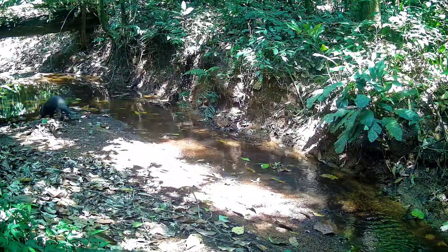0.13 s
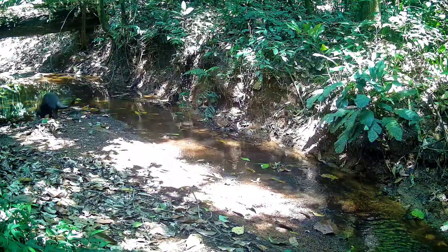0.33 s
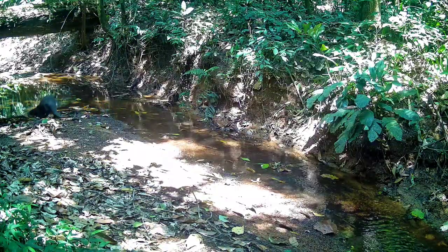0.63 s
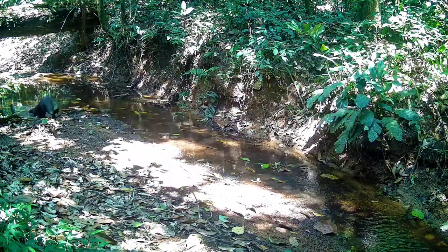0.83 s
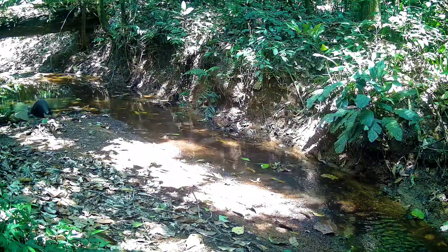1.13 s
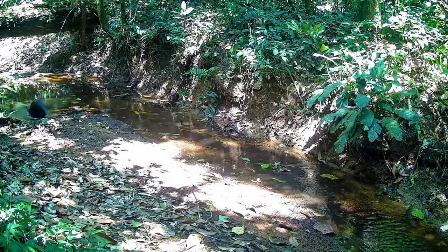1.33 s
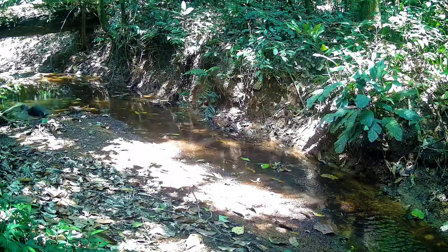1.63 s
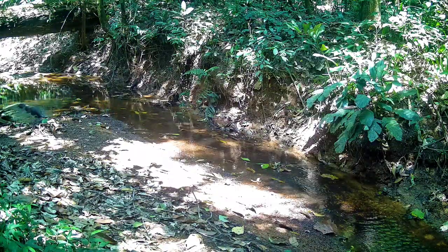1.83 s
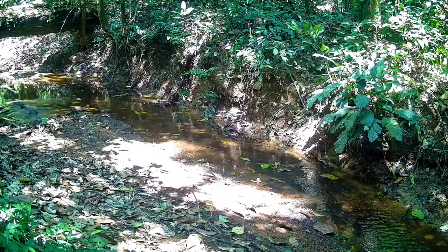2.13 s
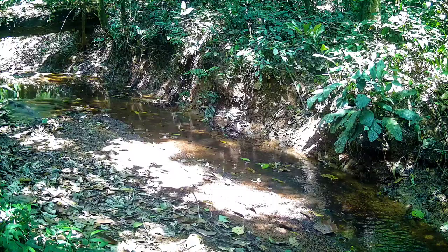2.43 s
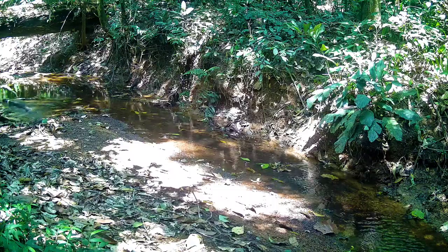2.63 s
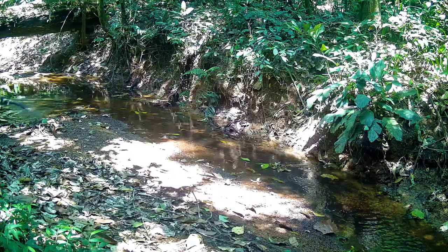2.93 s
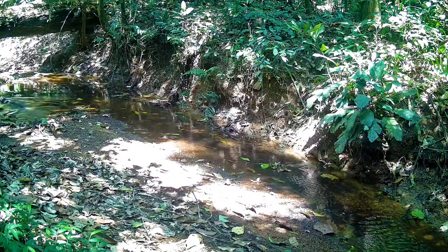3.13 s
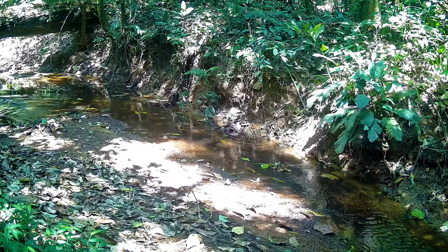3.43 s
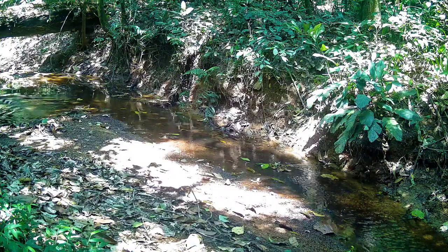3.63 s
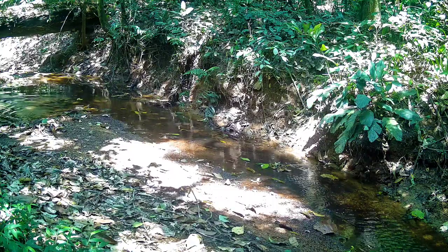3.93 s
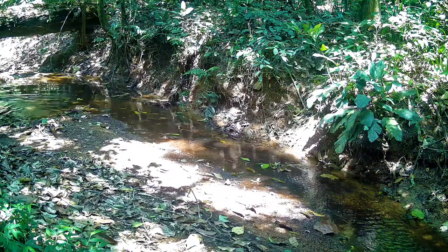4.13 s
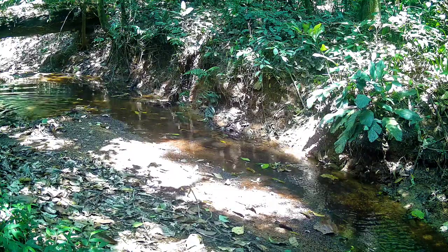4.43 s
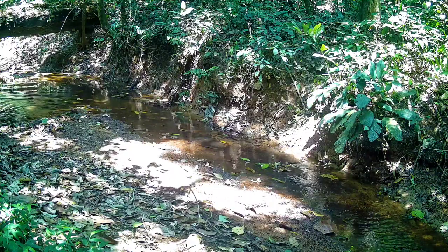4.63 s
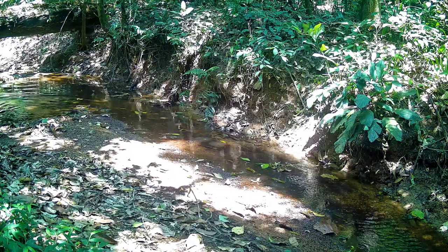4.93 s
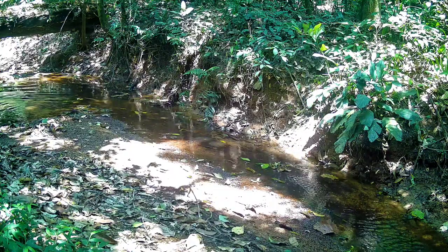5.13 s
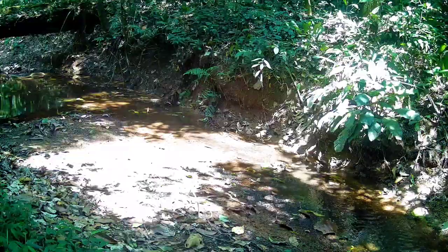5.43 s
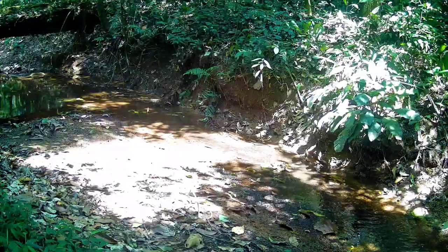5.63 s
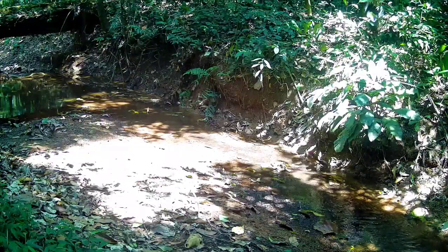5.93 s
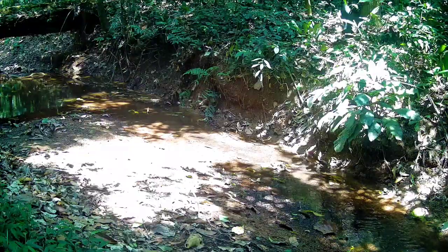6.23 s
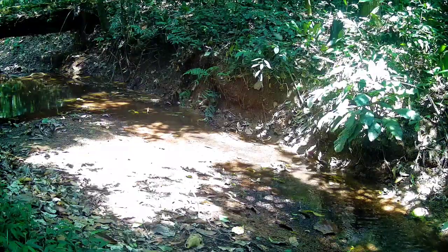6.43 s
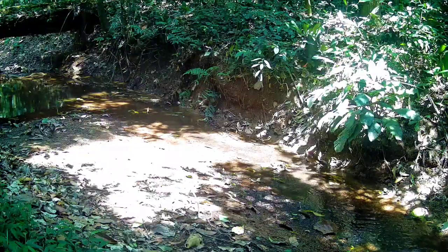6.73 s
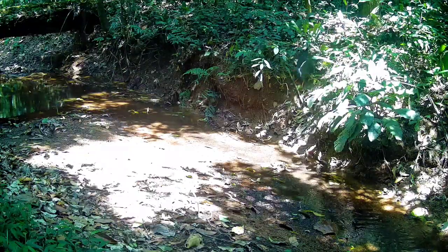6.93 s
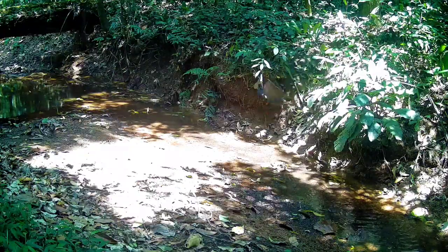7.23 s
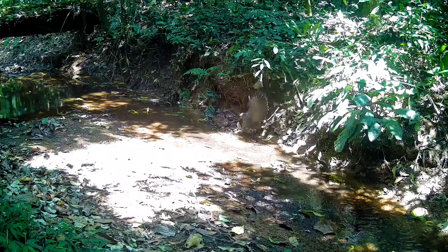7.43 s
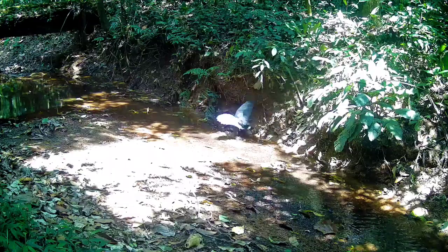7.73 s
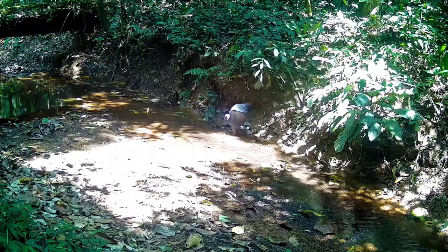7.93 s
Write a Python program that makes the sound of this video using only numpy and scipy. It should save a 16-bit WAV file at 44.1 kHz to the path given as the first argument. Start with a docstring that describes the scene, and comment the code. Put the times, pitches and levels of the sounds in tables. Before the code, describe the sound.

In a rainforest, cicadas hold a steady piercing trill above a soft shallow stream. Early on, one bird gives three quick, sharp falling chips with woody echoes, and faint whistles sound far off. The trill stops instantly at a hard cut. The stream remains, slightly louder, as a bird flicks through leaves and drops into the water with a short plop. A fixed outdoor microphone, with dull extreme treble.

```python
"""In a rainforest, cicadas trill in the trees over a shallow stream, until a cut to a second shot without them.
One bird gives three sharp falling chips, and others whistle far off. In the second shot the stream is
a little louder, and a bird flicks through the leaves and drops into the water with a plop.
The cicadas are clicks ringing hollow bodies, the birds gliding tones, the flicks shaped noise,
and the water is flickering noise with many small ringing bubbles."""
import sys
import numpy as np
from scipy import signal
from scipy.fft import rfft, irfft, next_fast_len
from scipy.io import wavfile
from scipy.ndimage import uniform_filter1d

SR = 44100
rng = np.random.default_rng(int(sys.argv[2]) if len(sys.argv) > 2 else 0)


def to_wav(sig):
    """Store sig (one row per channel, or 1-D mono) as 16-bit WAV at the path in sys.argv[1].

    Samples outside -1..1 are clipped; the rate is SR.
    """
    pcm = np.clip(np.atleast_2d(sig), -1, 1) * 32767
    pcm = np.round(pcm).astype(np.int16)
    wavfile.write(sys.argv[1], SR, pcm.T)  # frames by channels


N = 356107

TIME = np.arange(N) / SR  # seconds
GRID_HZ = np.arange(1, SR / 2, 20)  # frequencies at which resonances are drawn
CUT_S = 5.4505  # seconds at which the second shot begins
TOP_HZ = 8100  # highest pitch the microphone passes


def undb(db):
    """Turn decibels into a gain."""
    return np.exp(np.asarray(db) * (np.log(10) / 20))


def level(x, db):
    """Scale a sound to an rms level in dB."""
    return x * undb(db) / np.sqrt(np.mean(x ** 2))


def add(out, start, x):
    """Mix x into out, starting at a time in seconds."""
    i = int(start * SR)
    out[i:i + len(x)] += x[:len(out) - i]


def colour(x, points):
    """Filter x by a curve through (Hz, dB) points, straight lines over log frequency."""
    hz, db = np.transpose(points)
    size = next_fast_len(len(x) + SR // 10, True)
    f = np.maximum(np.fft.rfftfreq(size, 1 / SR), 1)
    gain = undb(np.interp(np.log(f), np.log(hz), db))
    return irfft(rfft(x, size) * gain, size)[:len(x)]


def walk(rate):
    """Chance drift with spread 1: random steps, rate of them per second, smoothed twice."""
    k = int(SR / rate)
    steps = np.repeat(rng.standard_normal(N // k + 1), k)[:N]
    return level(uniform_filter1d(uniform_filter1d(steps, k), k), 0)


def ring(hz, width):
    """Gain in dB of a resonance over GRID_HZ; it is 6 dB down at the edges of its width in Hz."""
    return -20 * np.log10(1 + (2 * (GRID_HZ - hz) / width) ** 2)


def forest(x, wet_db, t60, near_share, near_t60):
    """Direct sound, quick scatter from nearby leaves and a longer tail from the trunks."""
    t = TIME[:SR]
    # each t60 is the time in seconds to fade by 60 dB
    near = near_share / near_t60 * undb(-120 * t / near_t60)
    far = (1 - near_share) / t60 * undb(-120 * t / t60)
    scatter = rng.standard_normal(SR) * np.sqrt(near + far) * (t > .003)
    return x + undb(wet_db) * signal.oaconvolve(x, scatter / np.linalg.norm(scatter))[:N]


def bubble(hz, length, glide=0.057):
    """A pocket of air swells into ringing and dies, rising a little in pitch."""
    u = np.linspace(0, 1, int(length * SR))
    phase = 2 * np.pi * np.cumsum(hz * (1 + glide * (u - .5))) / SR
    return np.sin(np.pi * u ** .8) * np.sin(phase)


# Colour of the running water and the hush of the forest. Each row: frequency in Hz, gain in dB.
WATER_COLOUR = [(15, -44.5), (25, -14), (92, -1.5), (278, -4.5), (313, -6), (559, -3.5), (728, -3),
                (802, -3.5), (1180, -5), (1500, -5.5), (2490, -8), (4220, -9.5), (4650, -11), (6520, -13),
                (7900, -36.5), (10300, -67), (17400, -120)]
# How much softer the water is in the first shot. Each row: frequency in Hz, gain in dB.
WATER_FIRST_SHOT = [(60, -3), (200, -2), (600, -3.5), (1500, -3), (3000, -1.33), (6000, -2.5)]
STREAM_DB = -54  # rms level before the softening


def stream(first_shot, flicker_db=2.0, bubbles_db=-11, cycles=8, count=1500):
    """A soft wash whose octaves flicker on their own, with many small bubbles in it."""
    wash = np.zeros(N)
    size = next_fast_len(N, True)
    spectrum = rfft(rng.standard_normal(size))
    f = np.fft.rfftfreq(size, 1 / SR)
    for hz in 16 * 2 ** np.arange(10):
        octave = irfft(spectrum * (f >= hz) * (f < 2 * hz))[:N]
        wash += octave * undb(flicker_db * .5 * walk(10))
    babble = np.zeros(N)
    for when, pitch, loudness in rng.random((count, 3)):
        hz = 260 * 11 ** pitch  # 260 to 2860 Hz
        add(babble, when * N / SR, undb(3.7 * loudness) * bubble(hz, cycles / hz))
    mix = level(colour(wash, WATER_COLOUR), 0) + level(babble, bubbles_db)
    water = level(mix, STREAM_DB)
    return first_shot * colour(water, WATER_FIRST_SHOT) + (1 - first_shot) * water


SCOOP_S, SAG_HZ_PER_S = .028, 420  # a whistle slides up to its note while sinking slowly
# Far bird whistles. Each row: start in seconds, length in seconds, pitch in Hz,
# scoop from below as a share of the pitch, level in dB before the echoes, roughness as a share of the pitch.
FAR_WHISTLES = [(1.046, .15, 2285, 0.28, -55, 0.0036), (1.249, .14, 2250, 0.019, -54.5, 0.0048),
                (1.392, .14, 1900, 0, -57.5, .07), (2.552, 0.048, 2330, 0.086, -52.5, .055),
                (3.632, .046, 2280, 0, -56, .07), (5.84, .06, 4320, 0.0028, -61, 0.0077)]


def whistles(overtone_db=-12):
    """Thin notes from deep in the trees, swelling and fading in an arch, some clear, some raspy."""
    out, quaver = np.zeros(N), walk(500)
    for start, length, note_hz, scoop, db, rough in FAR_WHISTLES:
        t = TIME[:int(length * SR)]
        hz = note_hz * (1 - scoop * np.exp(-t / SCOOP_S)) - SAG_HZ_PER_S * t
        wobble = 1 + rough * quaver[int(start * SR):][:len(t)]
        phase = 2 * np.pi * np.cumsum(hz * wobble) / SR
        overtone = np.sin(2 * phase) * (2 * hz < TOP_HZ)
        voice = np.sin(phase) + undb(overtone_db) * overtone
        add(out, start, undb(db) * np.sin(np.pi * t / length) * voice)
    return forest(out, wet_db=-3, t60=1.0, near_share=.4, near_t60=0.072)


FLICK_RISE = 0.64  # a flick swells in this share of its fade time
# Flicks of wings, leaves and spray. Each row: time of the peak in seconds,
# level in dB before the swell and fade, fade time in seconds, centre frequency in Hz.
FLICK_BURSTS = [(5.632, -51, .007, 3300), (6.478, -38.5, .014, 5000), (6.61, -55.5, 0.054, 3800),
                (6.975, -37, .009, 5100), (7.28, -57.5, .12, 4300), (7.358, -54, .01, 4900),
                (7.572, -49.5, 0.022, 3870), (7.664, -47, .007, 4100), (7.70, -54.5, .02, 4200)]
# Colour shared by all flicks. Each row: frequency in Hz, gain in dB.
FLICK_TONE = [(400, -20), (1200, 3), (3000, -4), (4600, -3), (5800, -2), (6600, -12), (7400, -16),
              (8000, -24), (9000, -53)]


def flicks(grain_db=3, width_hz=2600):
    """Short bursts of grainy noise, each ringing around its own centre frequency."""
    out = np.zeros(N)
    t = TIME[:SR // 2] - .25  # seconds from the peak
    grains = rng.standard_normal(N) * undb(grain_db * np.clip(walk(900), -2, 1))
    for at, db, fade, hz in FLICK_BURSTS:
        piece = np.roll(grains, -int(at * SR))[:len(t)]
        burst = colour(piece, np.column_stack([GRID_HZ, ring(hz, width_hz)]))
        shape = np.exp(-np.maximum(-t / FLICK_RISE, t) / fade)
        add(out, at + t[0], shape * level(colour(burst, FLICK_TONE), db))
    return forest(out, wet_db=-11, t60=.8, near_share=.55, near_t60=.1)


# Plops, air pockets ringing in the water.
# Each row: start in seconds, pitch in Hz, level in dB before the echoes, length in seconds.
PLOP_BUBBLES = [(6.444, 634, -47, 0.025), (6.471, 624, -42.5, .012), (7.396, 927, -53.5, 0.047),
                (7.5864, 1080, -30.5, 0.0092), (7.688, 1090, -44, 0.004), (7.742, 734, -44.5, 0.0079)]


def plops():
    """Single air pockets in the water, ringing briefly between the banks."""
    out = np.zeros(N)
    for start, hz, db, length in PLOP_BUBBLES:
        add(out, start, undb(db) * bubble(hz, length))
    return forest(out, wet_db=-13.5, t60=0.5, near_share=0.44, near_t60=0.14)


CHIP_LOW_HZ, CHIP_ECHO_DB = 2810, -5.5  # every chip falls toward one pitch and has one strong echo
# Falling bird chips. Each row: start in seconds, starting pitch in Hz,
# level in dB before the colour and echoes, delay of the strong echo in seconds.
BIRD_CHIPS = [(.571, 4880, -22.5, .036), (.709, 4590, -21.5, 0.022), (.8438, 4110, -24.5, 0.026)]
# Colour of the chips. Each row: frequency in Hz, gain in dB.
CHIP_TONE = [(2400, 7.5), (3200, -0.5), (4200, -5.5), (6000, 1.5), (7000, -18), (7500, -27), (8000, -42),
             (9000, -56)]


def chips(fall_s=0.016, swell_s=0.0056, hold_db=-16, hold_s=0.02, overtone_db=-24, rough=0.02):
    """Each chip is a slightly hoarse tone with a quick burst, then a drop in pitch as it fades."""
    out, t = np.zeros(N), TIME[:SR // 12]
    quaver = 1 + rough * walk(2500)
    burst = (t / swell_s) ** 2 * np.exp(1 - (t / swell_s) ** 2)
    hold = (t / hold_s) * np.exp(1 - (t / hold_s) ** 3)
    fall = np.exp(-(t / fall_s) ** 1.745)  # tips over, drops fast, flattens out
    for start, high_hz, db, echo_s in BIRD_CHIPS:
        hz = CHIP_LOW_HZ + (high_hz - CHIP_LOW_HZ) * fall
        phase = 2 * np.pi * np.cumsum(hz * quaver[int(start * SR):][:len(t)]) / SR
        tone = (burst + undb(hold_db) * hold) * np.sin(phase)
        overtone = undb(overtone_db) * hold * np.sin(2 * phase)
        chip = undb(db) * (tone + overtone)
        add(out, start, chip)
        add(out, start + echo_s, undb(CHIP_ECHO_DB) * chip)
    return forest(colour(out, CHIP_TONE), wet_db=2.0, t60=0.51, near_share=0.42, near_t60=0.089)


def tymbals(click_hz, jitter=.14, click_db=2.5, clicks_per_throb=5.1, throb=0.33):
    """One insect's ribs buckle in a fast, uneven, throbbing train of clicks."""
    gap, size = rng.standard_normal((N // 100, 2)).T
    times = np.cumsum(np.abs(1 + jitter * gap)) / click_hz
    swing = 1 + throb * np.sin(2 * np.pi * click_hz / clicks_per_throb * times)
    force = swing * undb(click_db * size)
    return np.bincount((times * SR).astype(int), force, N)[:N]


TRILL_DB = -43  # rms level of the cicadas in the first shot
# Ringing of the cicadas' tymbals (buckling ribs) and hollow abdomens.
# Each row: centre frequency in Hz, width in Hz, relative strength in dB.
BODY_RINGS = [(4550, 220, -28), (4650, 420, -17.5), (5115, 290, -4), (5337, 310, 3), (5880, 390, -10.5),
              (6640, 890, -27.5)]
# Treble lost from the song. Each row: frequency in Hz, gain in dB.
SONG_TREBLE = [(6200, -1.5), (6900, -3.5), (7500, -6.5), (8000, -27), (9000, -50.5)]


def cicadas(click_hz=213, spread=.25, count=5):
    """Clicks ring each abdomen; each insect's own path through the trees blurs them into one sizzle."""
    clicks = np.zeros(N)
    for rate in click_hz * (1 + spread * np.linspace(-1, 1, count)):
        clicks += forest(tymbals(rate), wet_db=4.5, t60=.7, near_share=0.54, near_t60=0.091)
    power = sum(undb(db + ring(hz, width)) ** 2 for hz, width, db in BODY_RINGS)
    ringing = colour(clicks, np.column_stack([GRID_HZ, 10 * np.log10(power)]))
    return level(colour(ringing, SONG_TREBLE), TRILL_DB)


def scene():
    """The water, birds and trill of both shots in one channel."""
    first_shot = np.clip((CUT_S - TIME) / .0004, 0, 1)  # 1 in the first shot, 0 in the second
    # the water starts the second shot a little softer, just after the cut
    soft_start_db = -3.5 * (1 - first_shot) * np.exp(-np.abs(TIME - CUT_S) / 0.066)
    water = undb(soft_start_db) * stream(first_shot) + plops()
    birds = whistles() + flicks() + chips()
    return (water + birds + first_shot * cicadas())[None]


def record(dry):
    """The microphone cuts steeply above TOP_HZ, in the mid treble."""
    low_pass = signal.ellip(8, .2, 70, TOP_HZ, fs=SR, output="sos")
    return signal.sosfilt(low_pass, dry)


dry = scene()
out = record(dry)
to_wav(out)
```